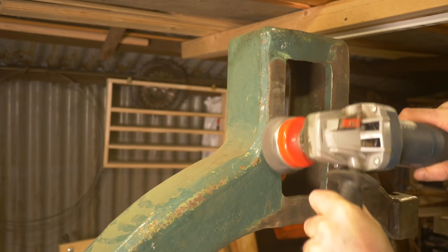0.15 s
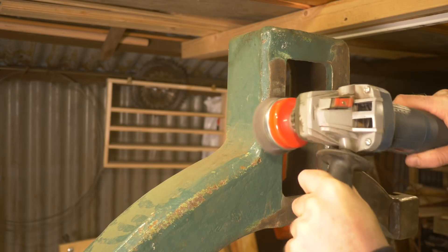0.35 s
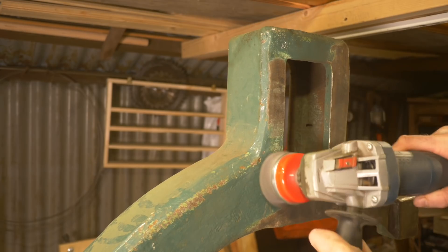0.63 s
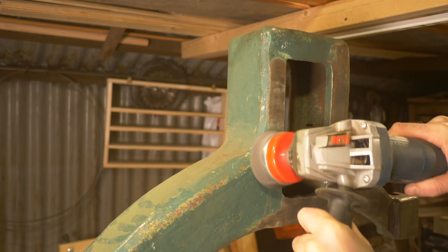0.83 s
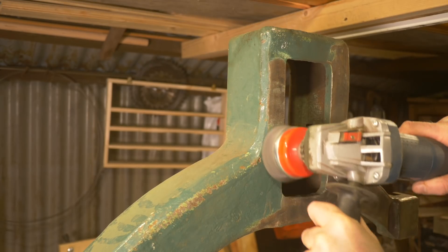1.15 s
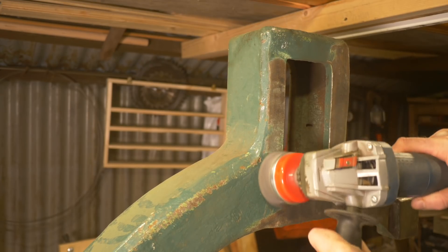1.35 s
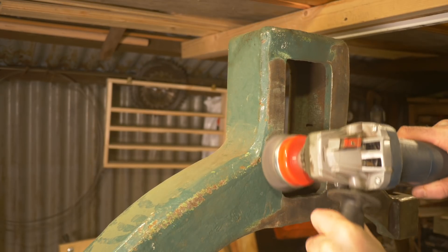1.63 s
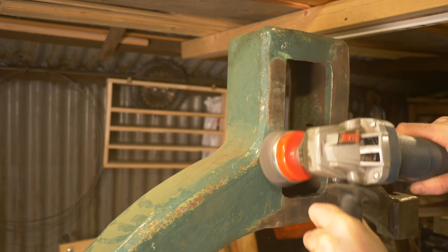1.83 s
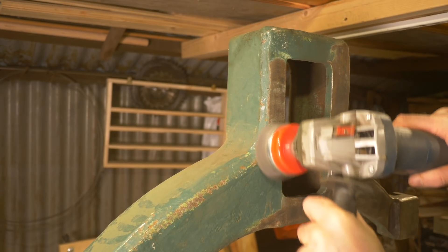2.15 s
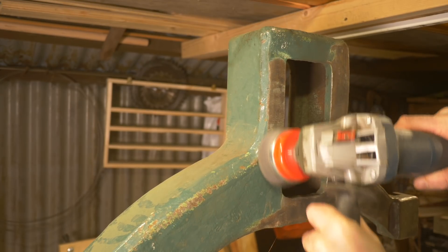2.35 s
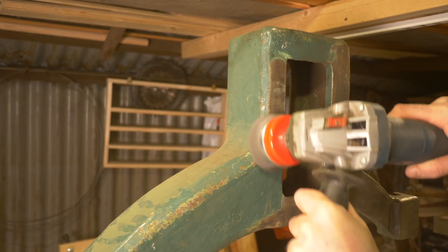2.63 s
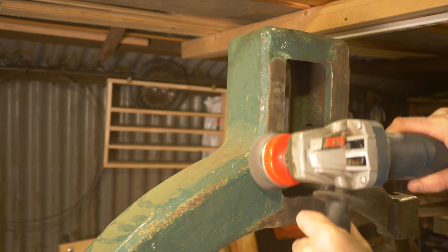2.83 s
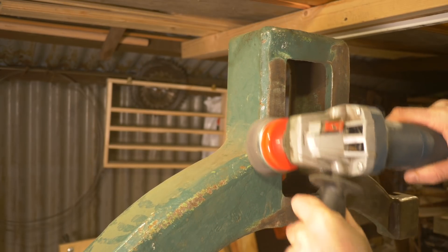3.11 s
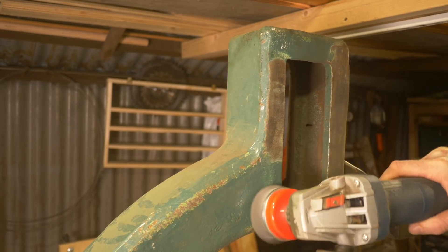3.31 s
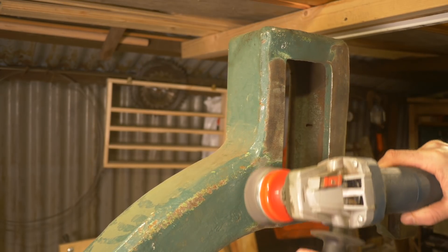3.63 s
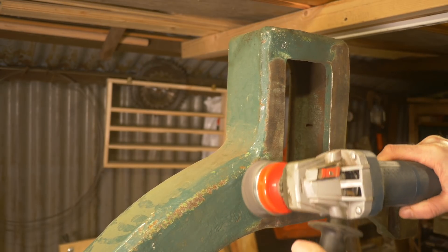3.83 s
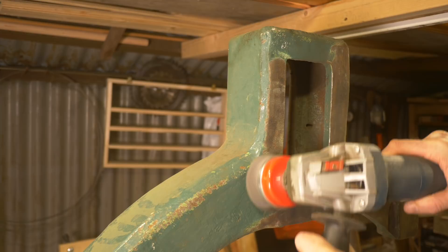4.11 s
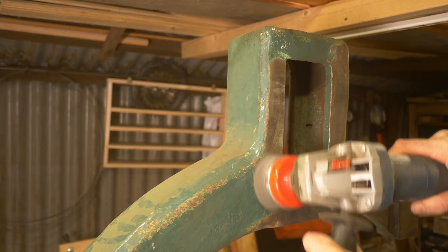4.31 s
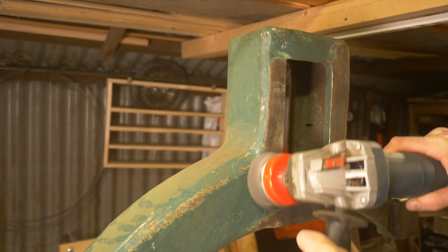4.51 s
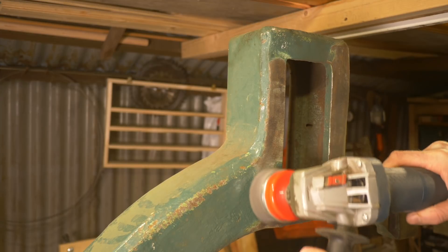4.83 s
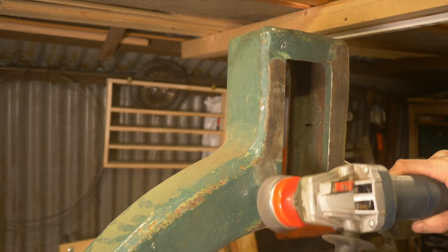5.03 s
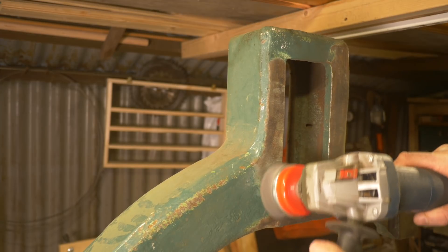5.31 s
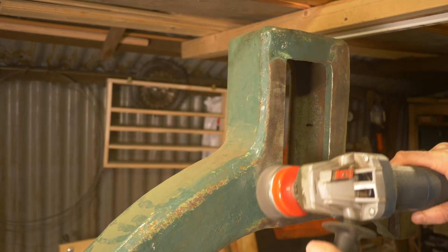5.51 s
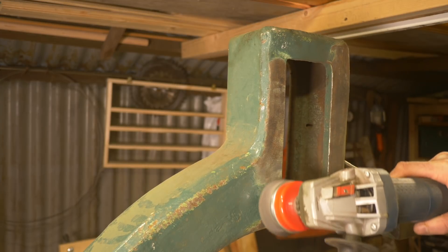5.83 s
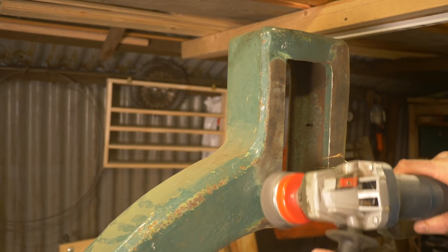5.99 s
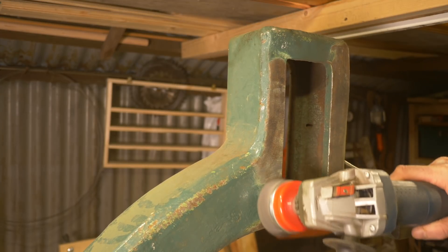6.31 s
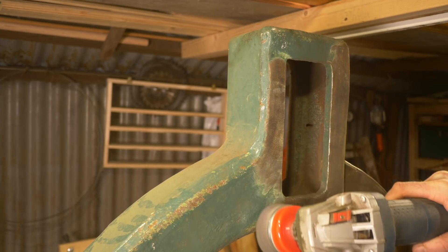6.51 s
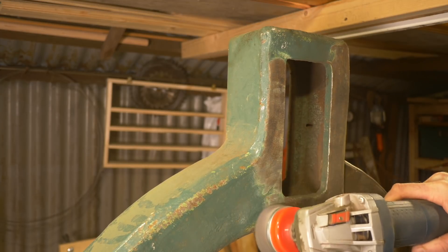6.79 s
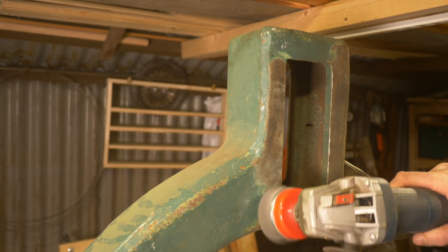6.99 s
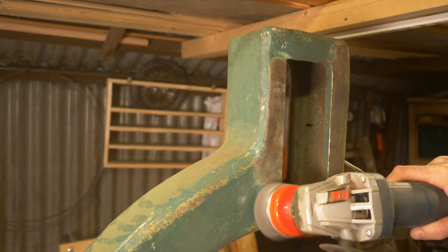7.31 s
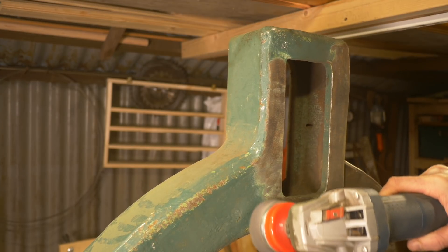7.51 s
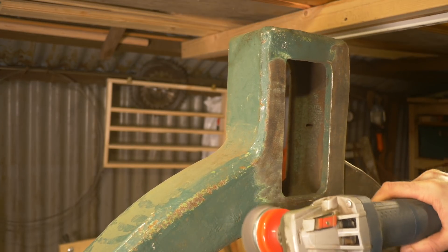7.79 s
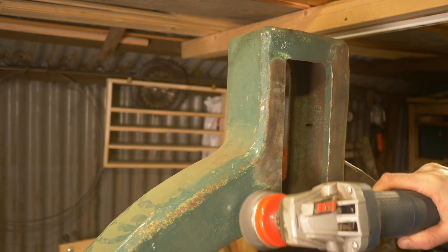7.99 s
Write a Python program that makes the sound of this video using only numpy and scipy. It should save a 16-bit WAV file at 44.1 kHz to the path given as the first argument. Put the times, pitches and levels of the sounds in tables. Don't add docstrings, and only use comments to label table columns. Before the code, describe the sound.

An angle grinder with a wire cup scours a hollow steel frame, a steady harsh metallic hiss with a thin high whistle, starting quiet then jumping louder.

```python
import sys
import numpy as np
from scipy import signal
from scipy.fft import rfft, irfft
from scipy.io import wavfile
from scipy.ndimage import uniform_filter1d

SR = 44100
rng = np.random.default_rng(int(sys.argv[2]) if len(sys.argv) > 2 else 0)


def generate_wav(signal):
    frames = np.transpose(np.atleast_2d(signal))
    scaled = np.clip(frames, -1, 1) * 32767
    pcm = np.round(scaled).astype(np.int16)
    wavfile.write(sys.argv[1], SR, pcm)


def makeup_ratio(level_db):
    decades = np.asarray(level_db, float) / 20
    return 10 ** decades


N = 359415


def unit(x):
    return x / np.sqrt(np.mean(x ** 2))


def curves(table):
    s, *columns = np.transpose(table)
    return [np.interp(np.arange(N) / SR, s, c) for c in columns]


def walk(rate):
    k = int(SR / rate)
    held = np.repeat(rng.standard_normal(N // k + 1), k)
    slewed = uniform_filter1d(uniform_filter1d(held, k), k)
    return unit(slewed[:N])


def tone(turns, multiple):
    return np.sqrt(2) * np.sin(2 * np.pi * (multiple * turns + rng.random()))


def wires(cup_turns, mains, scatter_db=1.5, snags_per_s=20, snag_db=6):
    tips = rng.standard_normal(N) * makeup_ratio(scatter_db * np.minimum(rng.exponential(size=N), 3))
    snag = (rng.random(N) < snags_per_s / SR) * rng.uniform(-1, 1, N)
    pulse = 1 + 0.019 * tone(cup_turns, 0.94) + 0.025 * tone(mains, 0.91)
    unsteady = makeup_ratio(0.43 * walk(14) + 0.29 * walk(150))
    return (unit(tips) + makeup_ratio(snag_db) * snag) * pulse * unsteady


# (frequency [Hz], level [dB per Hz])
STEEL_TILT = [(35, -74), (60, -35), (231, -27), (283, -22.5), (470, -20), (549, -17.5), (1140, -10.5),
              (1520, -9.5), (2260, -5.5), (2580, -6.5), (3300, 2), (4110, -3.5), (5610, -3.5),
              (6550, -10.5), (11900, -15), (15500, -45), (22000, -120)]
# (frequency [Hz], level [dB per Hz])
AIR_TILT = [(12500, -14.5), (14000, -20.5), (15200, -21), (16000, -23)]
# (frequency [Hz], width [Hz], level [dB], negative = dip)
STEEL_RINGS = [(1166, 71, 2), (1580, 270, -2.5), (2300, 410, 1), (3190, 400, 0.5), (3660, 150, 1.5),
               (5690, 700, 2.5), (8260, 590, -2.5), (9370, 900, 0.5), (10860, 700, 2), (11650, 450, -4)]


def steel_response():
    hz = np.linspace(1, SR / 2, 2049)
    points = np.array([p for p in STEEL_TILT if p[0] < 11800] + AIR_TILT)
    db = np.interp(np.log(hz), np.log(points[:, 0]), points[:, 1])
    for ring_hz, width_hz, gain_db in STEEL_RINGS:
        db = db + gain_db / (1 + (2 * (hz - ring_hz) / width_hz) ** 2)
    cepstrum = irfft(np.log(makeup_ratio(db)))
    cepstrum[1:2048] *= 2
    cepstrum[2049:] = 0
    return irfft(np.exp(rfft(cepstrum)))


REGION_EDGES_HZ = [2000, 4300, 6500, 13400]


def scour(cup_turns, mains, ring_db, lifted):
    t = np.arange(N) / SR
    sliding = np.maximum(t - 4.2, 0)
    drone_db = -10.5 + 0.2 * sliding
    cup_db = -3 + 0.47 * sliding
    sizzle_db = -7 + 0.1868 * t
    air_db = -12.7 - 0.7 * lifted
    region_db = [drone_db - 0.1, 0 * ring_db + 0.043, cup_db - 0.1, sizzle_db + 0.5, air_db]

    struck = signal.fftconvolve(shed(wires(cup_turns, mains)), steel_response())[:N]
    spectrum = rfft(struck)
    hz = np.arange(len(spectrum)) * SR / N
    below = [0 * hz] + [1 / (1 + (hz / e) ** 12) for e in REGION_EDGES_HZ] + [1 + 0 * hz]
    sound = 0
    for low, high, db in zip(below, below[1:], region_db):
        region = irfft(spectrum * (high - low), N)
        sound = sound + unit(region) * makeup_ratio(ring_db + db + 0.23 * walk(8.2))
    return sound


# (time [s], frame ring level [dB])
CUP_BITE = [(0, -44.5), (1.0, -45.5), (1.55, -44.5), (2.6, -45), (2.95, -46), (3.7, -45.5), (4.25, -44.5),
            (5.1, -45), (5.4, -45.5), (5.7, -45), (6.5, -45), (7.5, -45), (7.8, -45.5), (8.15, -45.5)]


def bite():
    return curves(CUP_BITE)[0]


# (time [s], whistle pitch [Hz], whistle level [dB])
LEAN = [(0.0, 13079, -51.0), (0.55, 13213, -47.2), (0.87, 12711, -46.8), (1.6, 12891, -45.1),
        (2.08, 12999, -49.4), (2.58, 13161, -44.3), (3.37, 13273, -42.9), (3.7, 12732, -45.8),
        (4.08, 12643, -43.5), (4.73, 12828, -45.6), (5.51, 12758, -45.1), (6.52, 12759, -48.3),
        (7.42, 13017, -47.7), (8.15, 12396, -51.7)]
# (time [s], whistle sag [Hz], spread [s], whistle change [dB])
BRAKING_PUSHES = [(0.31, 194, 0.062, 2.3), (0.72, 191, 0.074, 2.2), (1.07, 94, 0.049, -2.4),
                  (1.41, 208, 0.101, -2.9), (1.81, 164, 0.083, 0.7), (2.1, 208, 0.12, 3.6),
                  (2.57, 85, 0.057, -1.2), (2.99, 34, 0.072, -0.5), (3.4, 226, 0.075, -6.5),
                  (3.84, 206, 0.079, -1.6), (4.12, 292, 0.106, -3.4), (4.5, 188, 0.075, -0.6),
                  (4.87, 228, 0.064, -1.4), (5.16, 187, 0.089, -1.2), (5.46, 270, 0.093, -4.1),
                  (5.85, 200, 0.091, -0.7), (6.25, 124, 0.066, -0.9), (6.56, 116, 0.066, 0.8),
                  (6.8, 300, 0.105, 0.4), (7.12, 245, 0.12, -0.7), (7.47, 205, 0.089, -1.1),
                  (7.77, 111, 0.09, 0.8)]


def hands():
    lag = int(0.09 * SR)
    hz, db = curves(LEAN)
    hz = uniform_filter1d(uniform_filter1d(hz, lag), lag)
    at, sag_hz, spread, change_db = np.transpose(BRAKING_PUSHES)
    push = np.exp(-.5 * ((np.arange(N)[:, None] / SR - at) / spread) ** 2)
    return hz - push @ sag_hz, db + push @ change_db + 0.52 * walk(16)


WHISTLE_ORDER, GEAR_RATIO, MAINS_THROB_HZ = 23, 3.9, 100
# (multiple of shaft turn, level [dB], lower side tone [dB], upper side
# tone [dB])
SHAFT_TONES = [(1, -36, -20, -20), (2, -35, -20, -20), (6, -24, -20, -12), (8, -30, -20, -20),
               (10, -23, 1, -4), (12, -31, -12, -1), (16, -31, -3, -2), (17, -38, -20, -20),
               (20, -36, -20, -6), (22, -37, -20, -20)]
# (multiple of cup turn, level [dB])
CUP_TONES = [(1, -50.5), (5, -51), (6, -30.5), (8, -28.5), (10, -26), (12, -36.5), (15, -36), (18, -30)]
# (frequency [Hz], level [dB])
MAINS_HUM = [(50, -46), (100, -49), (200, -48), (300, -48)]


def motor(turns, mains, whistle_db, ring_db, lifted):
    second_db = -33.5 + (-47 + 33.5) * lifted + 1.2 * walk(4)
    third_db = -39.5 + (-28 + 39.5) * lifted + 1.2 * walk(4)

    lurch = .045 * np.sin(2 * np.pi * mains) + .004 * walk(60)
    whistle = tone(WHISTLE_ORDER * turns + lurch, 1) * (1 + .06 * tone(mains, 1))
    whistle = whistle * makeup_ratio(whistle_db + 0.2 + 1.4 * walk(45))

    body = 0
    for multiple, db, low_db, high_db in SHAFT_TONES:
        split = tone(turns, multiple)
        split = split + makeup_ratio(low_db) * tone(multiple * turns - mains, 0.86)
        split = split + makeup_ratio(high_db) * tone(multiple * turns + mains, 0.98)
        body = body + split * makeup_ratio(db + 4.4 * walk(6))
    cup_turns = turns / GEAR_RATIO
    for multiple, db in CUP_TONES:
        body = body + tone(cup_turns, multiple) * makeup_ratio(db + 4.6 * walk(6))
    body = body + tone(cup_turns, 2) * makeup_ratio(second_db - 1.0)
    body = body + tone(cup_turns, 3) * makeup_ratio(third_db - 3.0)
    for hz, db in MAINS_HUM:
        body = body + tone(np.arange(N) / SR, hz) * makeup_ratio(db + 3.3 * walk(12))
    return whistle + body * makeup_ratio(ring_db)


def shed(x, t60_s=.25, wash_db=-1):
    keep = makeup_ratio(-2 * 60 / (t60_s * SR))
    power = signal.lfilter([1 - keep], [1, -keep], x ** 2)
    return x + rng.standard_normal(N) * np.sqrt(power) * makeup_ratio(wash_db)


# (start [s], length [s], level [dB])
DRAUGHT_GUSTS = [
    (2.92, .17, -68),
    (3.22, .18, -67),
    (3.44, 0.21, -65),
    (3.7, 0.33, -67),
    (4.1, .2, -74),
]


def draught(rise_s=.03, fall_s=.12):
    slow = signal.butter(2, [4, 15], "band", fs=SR, output="sos")
    air = signal.sosfilt(slow, rng.standard_normal((2, N)))
    gust = air[0] / np.sqrt(uniform_filter1d(air[0] ** 2, size=7000) + 1e-12)
    t = np.arange(N) / SR
    blowing = 0
    for start, length, db in DRAUGHT_GUSTS:
        rise = np.clip((t - start) / rise_s, 0, 1)
        fall = np.clip(1 - (t - start - length) / fall_s, 0, 1)
        blowing = blowing + makeup_ratio(db) * rise * fall
    return gust * blowing, unit(air[1]) * makeup_ratio(-87.0)


# (time [s], low edge [Hz], high edge [Hz])
NOISE_SWAPS = [(.33, 5700, 7600), (.35, 4200, 5800), (.35, 11000, 12500), (.46, 6300, 9000),
               (.56, 4200, 5200), (.82, 4200, 5300), (1.14, 4200, 6400), (1.42, 5600, 7000),
               (1.42, 11000, 12500), (2.4, 4600, 5800), (3.53, 4600, 5800), (3.53, 6900, 9100),
               (4.39, 5200, 6400), (4.77, 6300, 8400), (5.83, 9000, 10500), (6., 8300, 10500),
               (6.07, 14500, 15700), (6.81, 4200, 5300), (7.07, 6900, 8400), (7.33, 14500, 15700),
               (7.9, 8300, 9800), (8.02, 8300, 10500)]


def drowned_by_whistle(x, gap_db=25.3, per_khz_db=4.1, waver_db=1.1):
    frame_size, lead, top_hz, band_hz = 2048, 665, 15720, 345
    hz, t, z = signal.stft(np.pad(x, ((0, 0), (lead, 0))), SR, nperseg=frame_size)
    power = abs(z[0]) ** 2 + 1e-18
    power_db = 10 * np.log10(power)

    top = hz > 12000
    peak_hz = hz[top][power[top].argmax(axis=0)]
    peak_db = 10 * np.log10(5 * uniform_filter1d(power[top], size=5, axis=0).max(axis=0))

    band = (hz // band_hz).astype(int)
    band_power = [power[band == b].mean(axis=0) for b in range(band.max() + 1)]
    band_db = 10 * np.log10(band_power)[band]
    above_hz = hz[:, None] - peak_hz
    distance_khz = ((band[:, None] + .5) * band_hz - peak_hz) / 1000
    mask_db = peak_db - gap_db - per_khz_db * distance_khz + waver_db * rng.standard_normal(len(t))

    loud_band = (band_db > mask_db) & (distance_khz > .35)
    kept = loud_band | (power_db > mask_db + 4) | (above_hz < 260)
    kept &= (above_hz < -700) | (above_hz > 260) | (power_db > peak_db - 35)
    z = z * (kept & (hz[:, None] < top_hz))

    for s, low_hz, high_hz in NOISE_SWAPS:
        rows = (hz > low_hz) & (hz < high_hz)
        frame = np.abs(t - s - lead / SR).argmin()
        z[:, rows, frame] *= 1.5 * np.exp(2j * np.pi * rng.random((2, rows.sum())))
    return signal.istft(z, SR, nperseg=frame_size)[1][:, lead:lead + N]


def scene():
    whistle_hz, whistle_db = hands()
    turns = np.cumsum(whistle_hz) / SR / WHISTLE_ORDER
    mains = MAINS_THROB_HZ * np.arange(N) / SR
    lifted = np.clip((whistle_hz - 12900) / (13150 - 12900), 0, 1)
    ring_db = bite()
    steel = scour(turns / GEAR_RATIO, mains, ring_db, lifted)
    sound = steel + motor(turns, mains, whistle_db, ring_db, lifted)
    return np.array([sound, sound])


def roll_off(x):
    return signal.sosfilt(signal.butter(12, 16920, fs=SR, output="sos"), x)


def record(dry):
    turn_up_s, turn_up_db = .7703, 20
    level = np.where(np.arange(N) / SR < turn_up_s, makeup_ratio(-turn_up_db), 1)
    gust, stir = draught()
    mix = (drowned_by_whistle(dry) + stir) * level + gust
    return roll_off(mix)


dry = scene()
out = record(dry)
generate_wav(out)
```